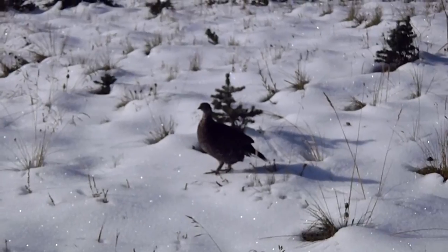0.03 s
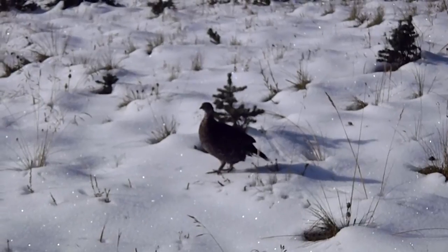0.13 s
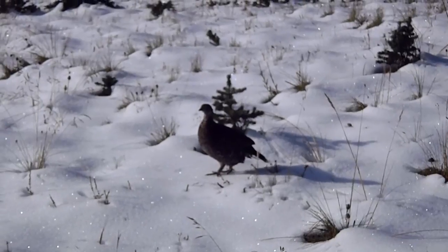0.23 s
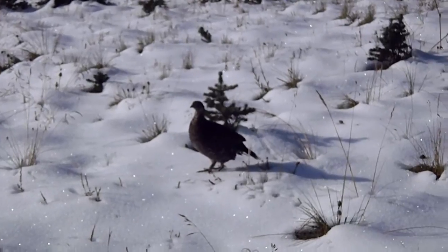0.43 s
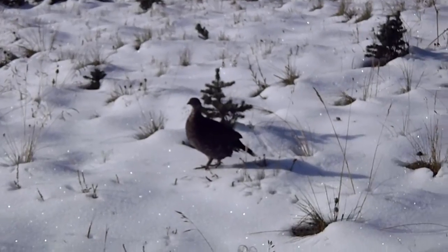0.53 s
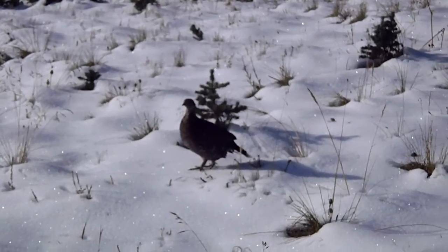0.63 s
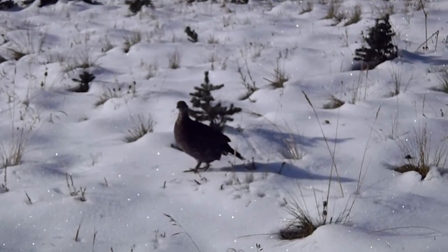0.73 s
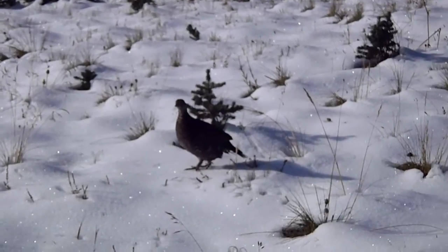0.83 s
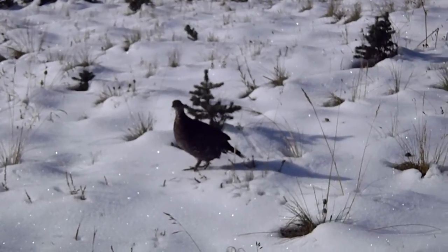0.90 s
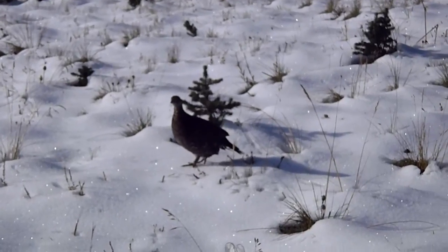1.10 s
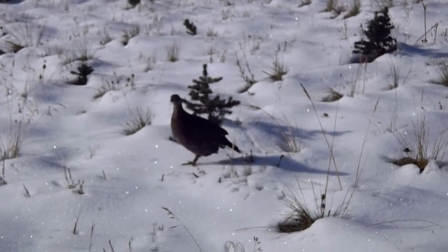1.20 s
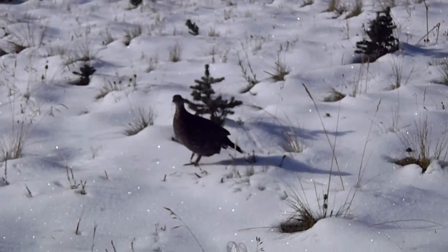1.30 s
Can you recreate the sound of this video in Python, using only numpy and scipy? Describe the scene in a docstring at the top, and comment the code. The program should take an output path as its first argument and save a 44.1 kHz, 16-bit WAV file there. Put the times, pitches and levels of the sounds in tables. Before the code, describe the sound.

A low, steady outdoor wind rumble, briefly interrupted by a soft bump on the microphone.

```python
"""Light wind on a snowy slope

Open ground, heard from a hand-held camera: wind rumbles on the microphone, with a rush far off.
One soft bump, probably on the camera body, gives a dull thump that dies at once.
Close to the microphone the camera's mechanism whines faintly, fluttering at the picture rate."""
import sys
import numpy as np
from scipy import signal
from scipy.fft import rfft, irfft
from scipy.io import wavfile

SR = 44100
rng = np.random.default_rng(int(sys.argv[2]) if len(sys.argv) > 2 else 0)


def transcribe(u):
    """Save the signal u as a 16-bit wav file named by the first command-line argument.

    u: samples, shape (n,) or (channels, n), limited to [-1, 1]; the rate is SR.
    q: integer samples, one column per channel.
    """
    v = np.clip(np.atleast_2d(u).T, -1, 1)
    q = np.round(v * 32767).astype(np.int16)
    wavfile.write(sys.argv[1], SR, q)


N = 59535


def undb(db):
    """Decibels to gain."""
    return 10 ** (np.asarray(db) / 20)


def level(x, db):
    """Set the rms level."""
    return x * undb(db) / np.sqrt(np.mean(x ** 2))


def filtered(x, response):
    """Apply a frequency response, given as a function of Hz."""
    f = np.maximum(np.arange(N // 2 + 1) * SR / N, 1e-3)
    return irfft(rfft(x) * response(f), N)


def noise(response):
    """Noise of rms 1, coloured by a frequency response."""
    return level(filtered(rng.standard_normal(N), response), 0)


def drift(rate_hz):
    """Smooth random drift of spread 1."""
    return noise(lambda f: np.exp(-(f / rate_hz) ** 2))


def resonant_noise(hz, half_width_hz):
    """Noise of rms 1 through the same resonance twice."""
    width = 2 * half_width_hz
    return noise(lambda f: (1j * f * width / (hz ** 2 - f ** 2 + 1j * f * width)) ** 2)


def thump(t):
    """Each soft contact pushes the microphone, which recoils more slowly; the casing ticks faintly."""
    # a light touch, then the blow: t/s, level/dB, softness/s
    contacts = [(.2003, -24.5, 0.00127), (0.204, -7, 0.00056)]
    recoil_db, recoil_lag, recoil_stretch = -9, 5.35, 3.04  # lag and stretch in units of the softness
    tick_hz, tick_db, tick_decay_s = 1145, -41, 0.0025
    mic_low_cut_hz = 8
    pulses = 0
    for at, db, softness in contacts:
        age = (t - at) / softness
        push = np.exp(-.5 * age ** 2)
        recoil = undb(recoil_db) * np.exp(-.5 * ((age - recoil_lag) / recoil_stretch) ** 2)
        pulses += undb(db) * (push - recoil)
    touch_at, _, touch_softness = contacts[0]  # the casing rings as the first touch begins
    since = np.maximum(t - (touch_at - touch_softness), 0)
    tick = undb(tick_db) * np.sin(2 * np.pi * tick_hz * since) * np.exp(-since / tick_decay_s)
    return filtered(pulses + tick, lambda f: 1j * f / (mic_low_cut_hz + 1j * f))


def wind(t):
    """Wind on the microphone: the low octaves follow its strength and flicker, the hiss stays even."""
    # spectrum of steady air and microphone hiss: f/Hz, relative level/dB
    air_spectrum = [(20,1),(40,0),(76,-2),(135,0.5),(200,-3),(280,-2.5),(450,-6.5),(807,-8.5),(1230,-16),(2030,-22.5),(3720,-30.5),(4100,-27),(4960,-34.5),(7000,-39.5),(13500,-45.5)]
    # strength of the wind's rumble: t/s, relative level/dB
    gusts = [(0, -1), (.13, 0), (.26, -0.5), (.32, -5), (.42, -2.5), (.5, -2), (.57, -1), (.7, -4),
             (.82, -1.5), (.9, 1), (1.01, -3.5), (1.06, 1), (1.11, -1.5), (1.2, 3), (1.35, -2.5)]
    rumble_top_hz, flicker_db = 340, 2.5
    hz, db = np.array(air_spectrum).T
    air = level(noise(lambda f: undb(np.interp(np.log(f), np.log(hz), db))), db=-53)
    gust_db = np.interp(t, *np.array(gusts).T)
    octaves = np.arange(5, 15)  # bands centred on 2 ** octave Hz
    out = 0
    for octave in octaves:
        band = filtered(air, lambda f: np.interp(np.log2(f), octaves, octaves == octave))
        wind_share = 1 / (1 + (2. ** octave / rumble_top_hz) ** 2)
        out += band * undb(wind_share * (gust_db + flicker_db * drift(rate_hz=18)))
    return out


def distant_rush(t):
    """Far-off rushing in broad resonances that swell briefly; a hollow note below swells on its own."""
    # resonances of the rush: f/Hz, half-width/Hz, level between swells/dB
    resonances = [(1044, 100, -64.5), (1211, 112, -65.5), (1720, 430, -83.5), (2926, 230, -82)]
    # brief swells of the rush: t/s, half-length/s, rise/dB
    swells = [(0.042, .012, 7), (.115, 0.018, 8), (0.31, 0.023, 7), (0.477, 0.0097, 9.5), (1.1, 0.034, 6),
              (1.144, 0.01, 4.5), (1.284, 0.12, 1.5)]
    # course of the hollow note: t/s, level/dB
    hollow_levels = [(0, -65), (.1, -55), (.16, -65), (.25, -54), (.33, -68.5), (.82, -72.5), (.86, -57.5),
                     (.915, -57), (.95, -64), (1.0, -57), (1.15, -70), (1.24, -52.5), (1.35, -61)]
    steady = sum(undb(db) * resonant_noise(hz, half_width) for hz, half_width, db in resonances)
    swell_db = sum(db * np.exp(-((t - at) / half_length) ** 2) for at, half_length, db in swells)
    flicker_db = 2.12 * drift(rate_hz=100)
    hollow = resonant_noise(hz=586, half_width_hz=64)
    hollow_db = np.interp(t, *np.array(hollow_levels).T)
    return steady * undb(swell_db + flicker_db) + hollow * undb(hollow_db)


def camera_whine(t):
    """The mechanism, close by: a thin, unsteady tone and a fainter, steady-pitched one an octave up."""
    frame_hz, whine_hz, upper_hz = 30, 3946, 7882
    wander_hz, swing_hz, flutter_depth = 12, 29, 0.43
    frame_phase = 2 * np.pi * frame_hz * t
    # the lower tone's pitch swings once a frame, its level twice
    pitch_hz = whine_hz + wander_hz * drift(rate_hz=52) + swing_hz * np.sin(frame_phase)
    flutter = 1 + flutter_depth * np.sin(2 * frame_phase)
    tone = flutter * np.sin(2 * np.pi * np.cumsum(pitch_hz) / SR)
    upper = (1 + np.sin(frame_phase)) * np.sin(2 * np.pi * upper_hz * t)
    return level(tone, db=-75.5) + level(upper, db=-96.5)


def scene():
    """Everything at one microphone, with no echo over the snow."""
    t = np.arange(N) / SR
    return (wind(t) + distant_rush(t) + thump(t) + camera_whine(t))[None]


def record(dry):
    """The recorder cuts the top treble steeply."""
    top_hz = 14067
    return signal.sosfilt(signal.ellip(10, .2, 70, top_hz, fs=SR, output="sos"), dry)


dry = scene()
out = record(dry)
transcribe(out)
```